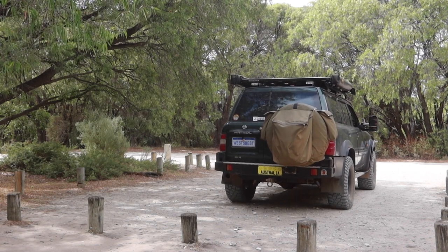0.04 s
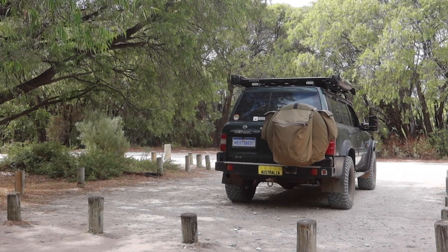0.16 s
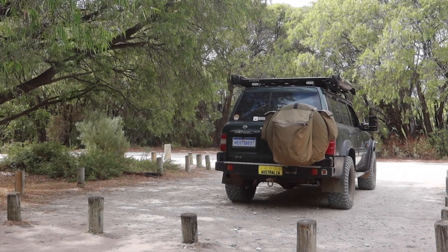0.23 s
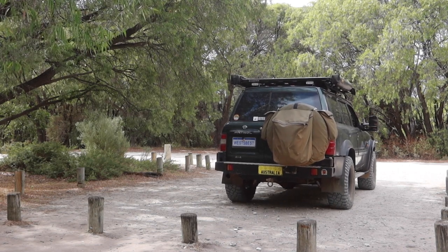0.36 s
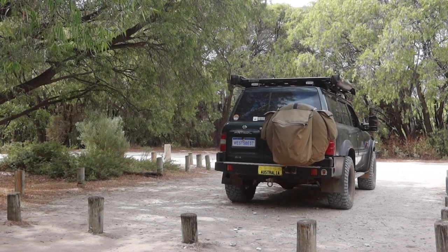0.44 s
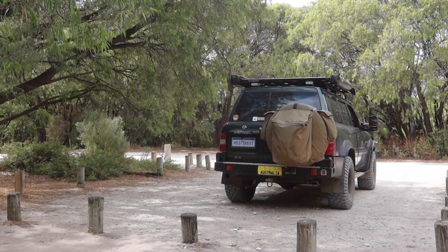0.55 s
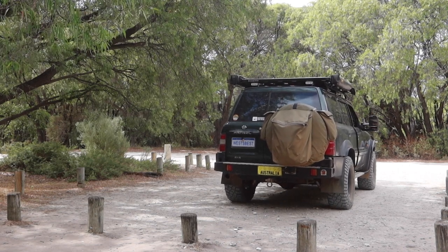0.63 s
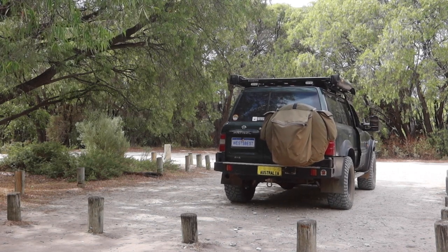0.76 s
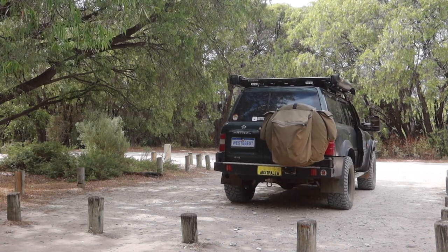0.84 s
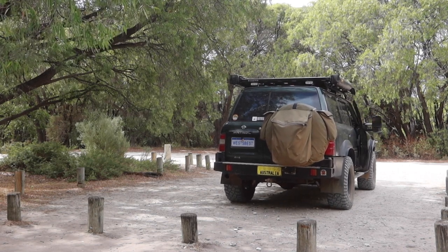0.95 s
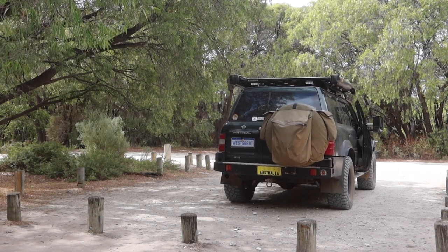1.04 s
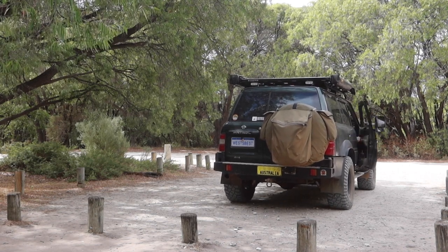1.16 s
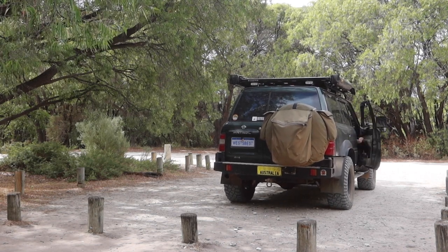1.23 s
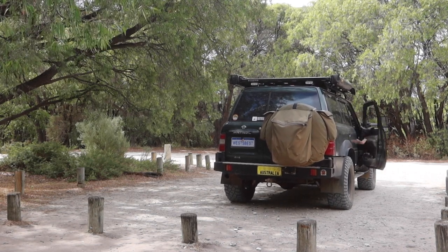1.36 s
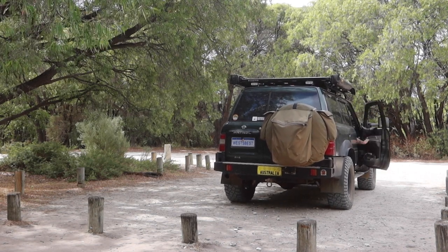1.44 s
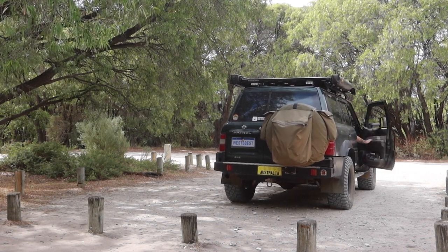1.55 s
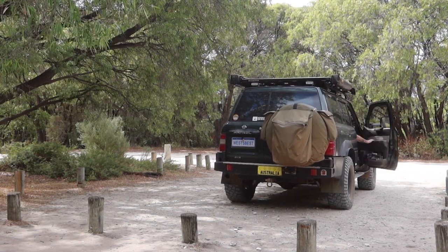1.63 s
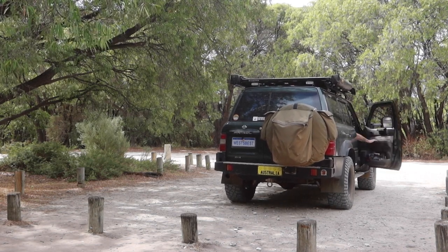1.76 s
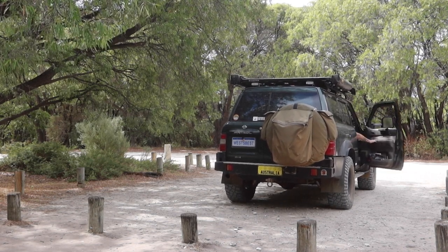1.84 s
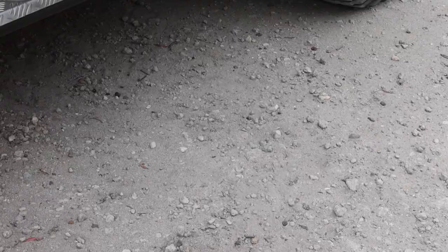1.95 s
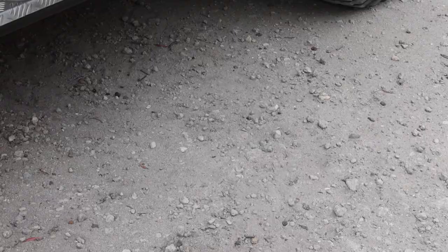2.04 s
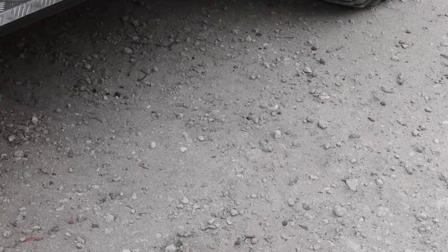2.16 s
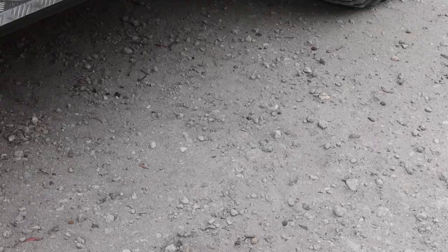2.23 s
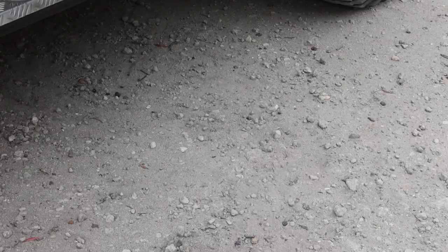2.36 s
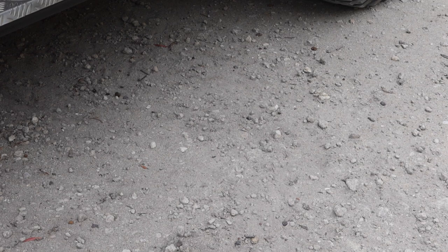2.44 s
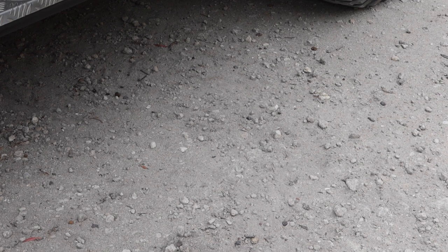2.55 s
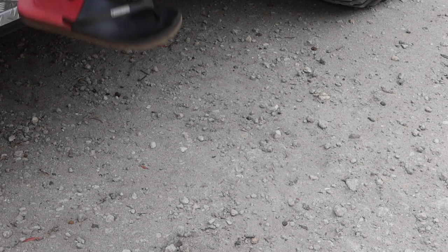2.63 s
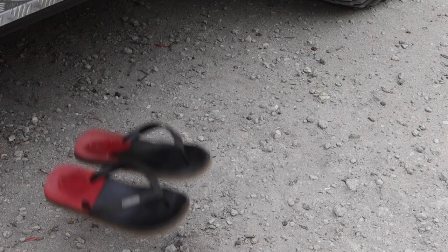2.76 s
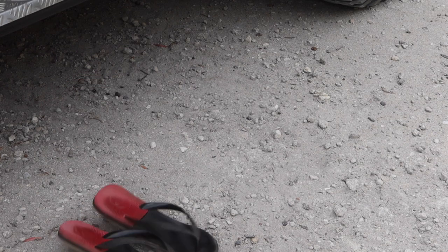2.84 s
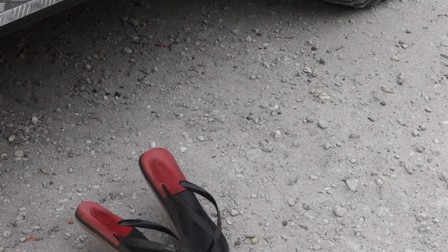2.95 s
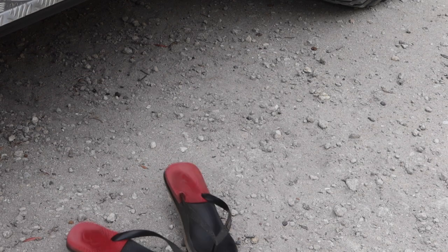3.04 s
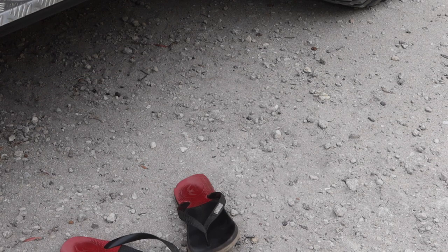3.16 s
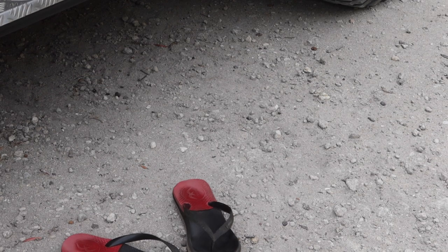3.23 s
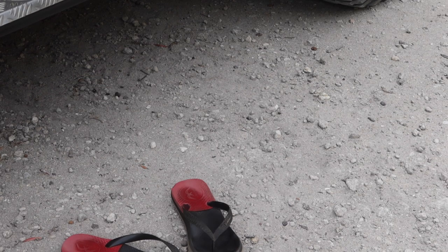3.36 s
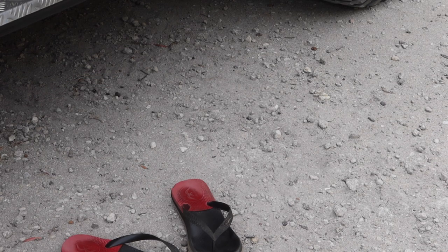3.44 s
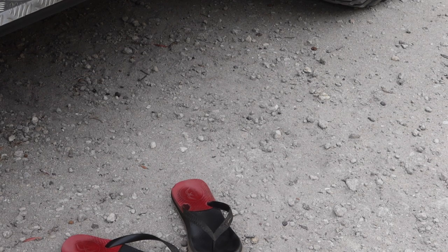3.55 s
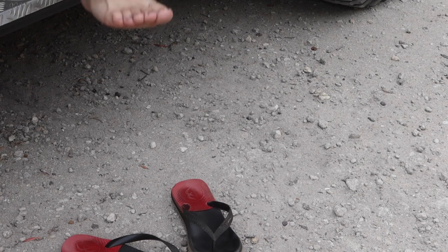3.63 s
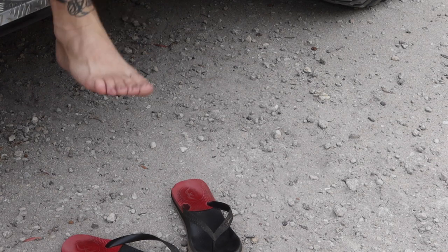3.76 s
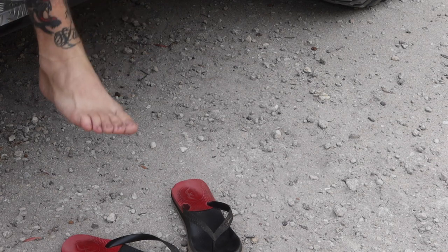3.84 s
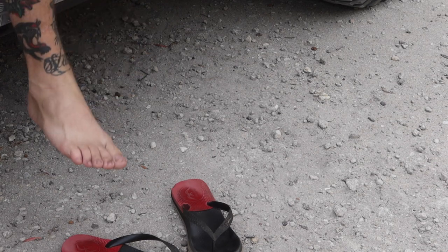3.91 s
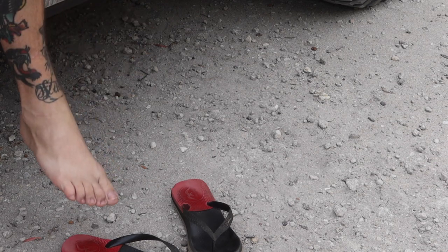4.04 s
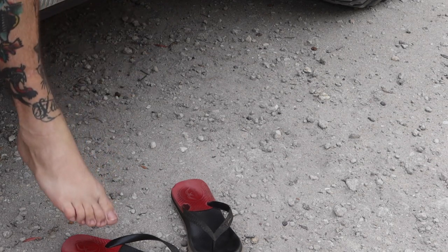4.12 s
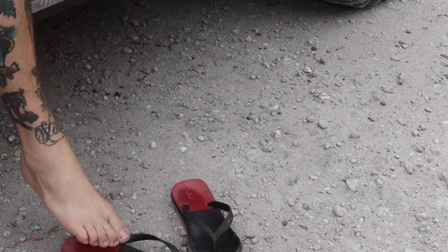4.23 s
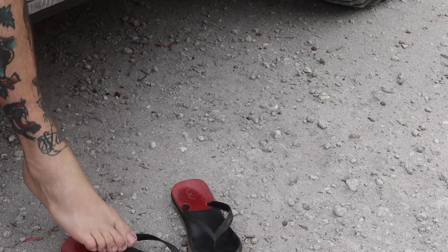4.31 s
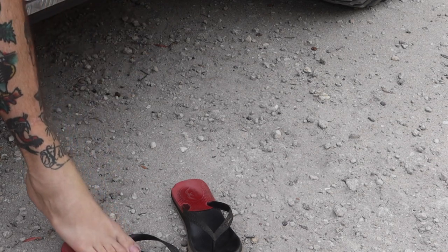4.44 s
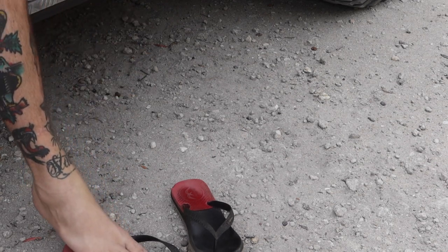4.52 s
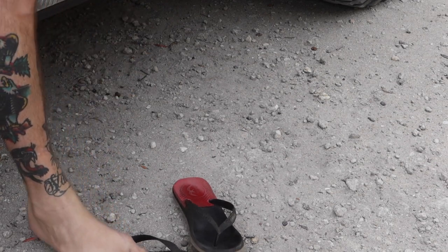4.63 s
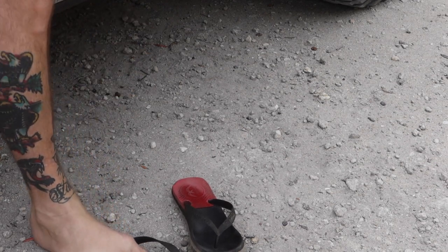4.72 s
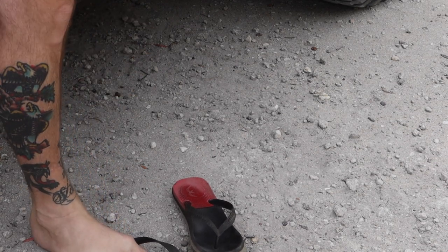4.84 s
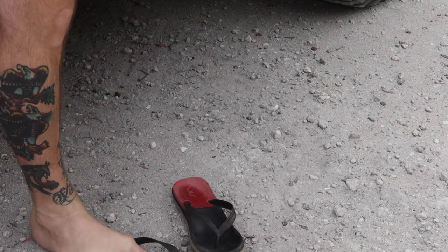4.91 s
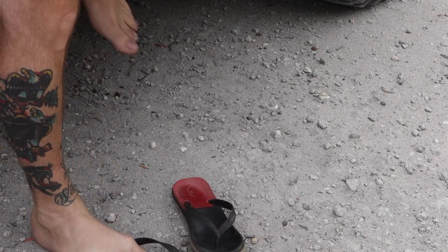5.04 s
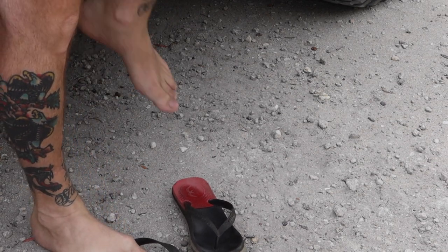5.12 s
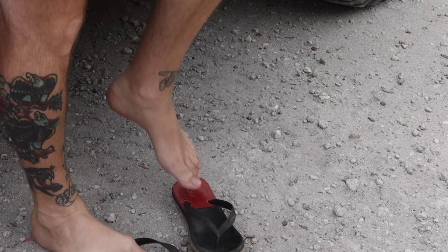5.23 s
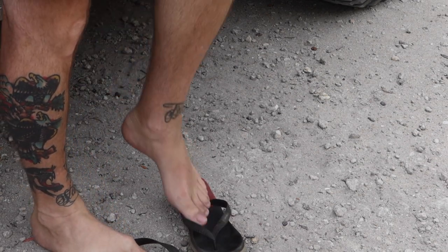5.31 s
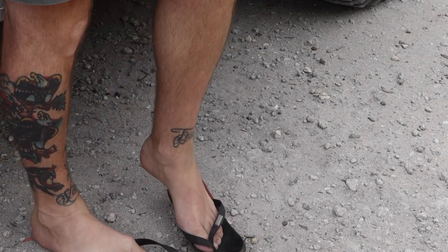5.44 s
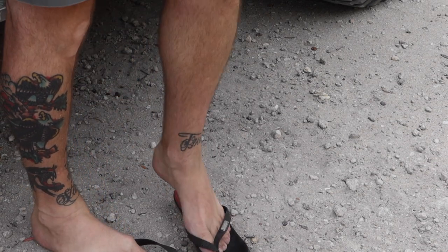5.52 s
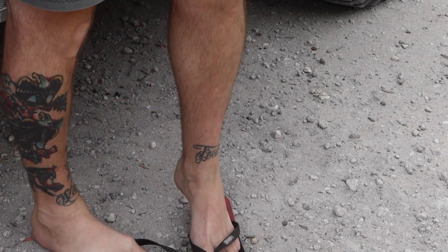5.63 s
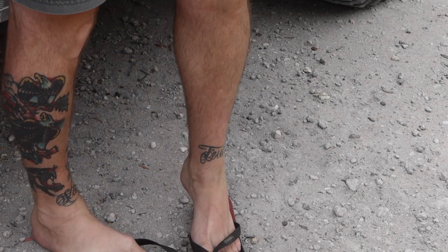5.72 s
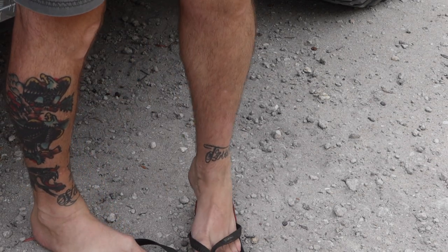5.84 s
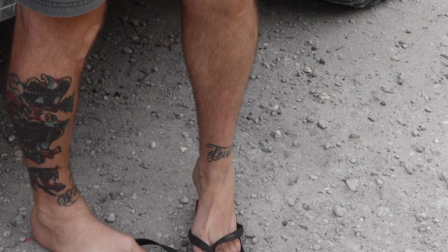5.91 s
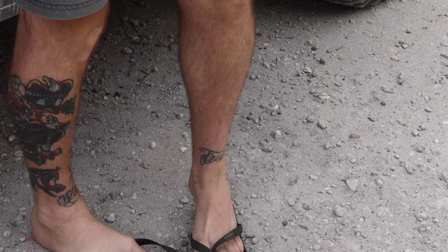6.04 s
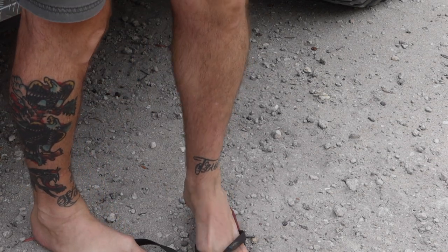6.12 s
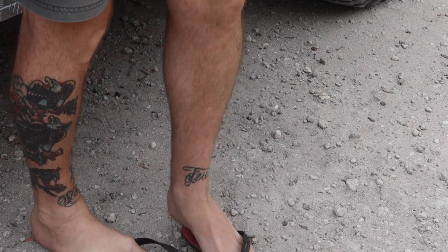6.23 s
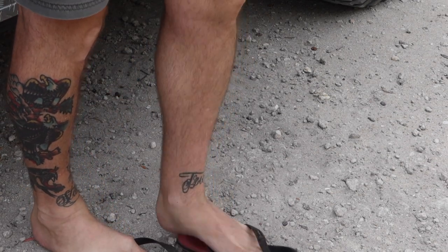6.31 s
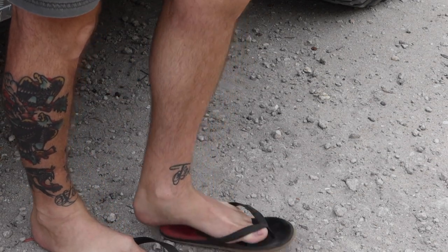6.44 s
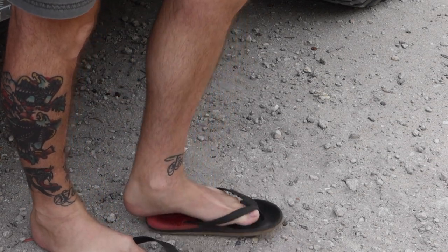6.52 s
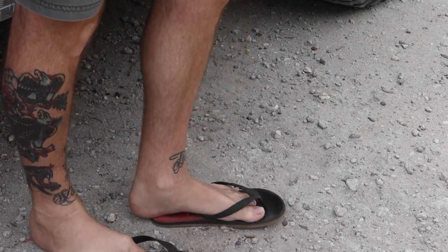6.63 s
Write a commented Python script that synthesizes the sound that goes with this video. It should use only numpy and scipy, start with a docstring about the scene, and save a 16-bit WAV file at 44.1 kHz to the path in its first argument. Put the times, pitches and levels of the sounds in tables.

```python
"""Rubber sandals slap onto gravel beside a parked four-wheel drive: air pulses, cracks, pitched resonances.
Clothes slide over the seat (hiss, scrape, hollow rub); feet step into the sandals (thuds, crunches, clicks)
and grind the grit (clumped snaps, ringing stones). Before that, a door is unlatched some way off (knocks,
rattles, steel clicks) in louder outdoor air (shaped, wandering noise). Dull bumps, a low wind rumble,
a brief hum and steady open air (shaped noise) lie behind."""
import sys
import numpy as np
from scipy import signal
from scipy.fft import rfft, irfft, next_fast_len
from scipy.io import wavfile
from scipy.ndimage import uniform_filter1d

SR = 44100
rng = np.random.default_rng(int(sys.argv[2]) if len(sys.argv) > 2 else 0)


def persist_wave(psi):
    """Save psi, clipped to +-1, as 16-bit WAV."""
    counts = np.round(np.clip(psi, -1, 1) * 32767).astype(np.int16)
    wavfile.write(sys.argv[1], SR, np.atleast_2d(counts).T)


N = 294323
TIME = np.arange(N) / SR   # s


def from_db(db):
    """Gain of a level in dB."""
    return 10 ** (np.asarray(db) / 20)


def rms_one(x):
    """The same signal at rms 1."""
    return x / np.sqrt(np.mean(x ** 2) + 1e-20)


def noise():
    """White noise."""
    return rng.standard_normal(N)


def coloured(x, spectrum):
    """Give a steady signal a spectrum, with 18 dB/octave skirts beyond its ends; rms 1."""
    hz, db = np.transpose(spectrum)
    size = next_fast_len(N, True)
    f = np.maximum(np.arange(size // 2 + 1) * SR / size, 1)
    skirts = np.minimum(f / hz[0], 1) ** 3 * np.minimum(hz[-1] / f, 1) ** 3
    gain = from_db(np.interp(np.log(f), np.log(hz), db)) * skirts
    return rms_one(irfft(rfft(x, size) * gain, size)[:N])


def band(x, low_hz, high_hz):
    """Gentle band-pass."""
    edges_hz = [low_hz, min(high_hz, .45 * SR)]
    return signal.sosfilt(signal.butter(2, edges_hz, "band", fs=SR, output="sos"), x + 1e-18)


def resonate(x, hz, width_hz):
    """A resonance with gain 1 on top."""
    r = np.exp(-np.pi * width_hz / SR)
    zeros = np.array([1, 0, -1]) * (1 - r * r) / 2
    poles = [1, -2 * r * np.cos(2 * np.pi * hz / SR), r * r]
    return signal.lfilter(zeros, poles, x + 1e-18)


def narrow_noise(hz, width_hz):
    """Noise in a resonance whose pitch may move; rms 1."""
    lowpass = signal.butter(2, width_hz / 2, fs=SR, output="sos")
    slow = signal.sosfilt(lowpass, noise() + 1j * noise())
    carrier = np.exp(2j * np.pi * np.cumsum(hz * np.ones(N)) / SR)
    return rms_one((slow * carrier).real)


def flutter(rate_hz, depth_db):
    """A gain gliding between random levels, rate_hz of them a second."""
    knots = rng.standard_normal(4096)
    return from_db(depth_db * np.interp(TIME * rate_hz, np.arange(len(knots)), knots))


def grains(per_s, spread_db):
    """Random clicks of either sign, their sizes spread exponentially in dB."""
    sizes = from_db(spread_db * np.minimum(rng.exponential(1, N), 4))
    return (rng.random(N) < per_s / SR) * sizes * rng.choice([-1, 1], N)


def evened(x):
    """Hold a noise at near-constant strength, so that its envelope decides how hard a blow is."""
    power = uniform_filter1d(x ** 2, size=SR // 80)   # over 12.5 ms
    return x / np.sqrt(power + .02 * np.mean(x ** 2))


def blows(times_s, levels_db, t60s, rise_s):
    """Envelope of blows that rise fast and die away; their powers add."""
    power = np.zeros(N)
    for at_s, db, t60_s in zip(times_s, levels_db, np.broadcast_to(t60s, len(times_s))):
        start = int(at_s * SR)
        age = TIME[:min(N - start, SR // 2)]
        envelope = from_db(db - 60 * age / t60_s) * (1 - np.exp(-age / rise_s))
        power[start:start + len(age)] += envelope ** 2
    return np.sqrt(power)


def stroke(start_s, length_s, rise_s, release_s):
    """Envelope of one movement: it swells, holds, and fades once its length is over."""
    swell = np.clip((TIME - start_s) / rise_s, 0, 1)
    return swell * np.clip(1 - (TIME - start_s - length_s) / release_s, 0, 1)


def strokes(rows, release_s):
    """Envelope of movements given as (start s, length s, rise s, dB); their powers add."""
    return np.sqrt(sum((from_db(db) * stroke(start_s, length_s, rise_s, release_s)) ** 2
                       for start_s, length_s, rise_s, db in rows))


def scattered(x, t60_s, delay_s):
    """Dense, short reflections from the car's side, its open door and the ground."""
    age = TIME[:SR // 4]
    build_up = 1 - np.exp(-(age / delay_s) ** 2)
    echo = rng.standard_normal(len(age)) * from_db(-60 * age / t60_s) * build_up
    return signal.fftconvolve(x, echo / np.linalg.norm(echo))[:N]


def sandals():
    """A sole moves a pulse of air and cracks on the grit; ground and car side colour the slap's pitch."""
    # rubber slaps and their echoes off the car's side:
    # t/s, pulse level/dB before band-pass, pulse f/Hz, crack re pulse/dB
    slaps = [(2.8628, 2, 660, -19.5), (2.8692, -4, 740, -20), (2.8707, -8.5, 1240, -19),
             (2.8754, -7.5, 1960, -7.5), (3.1241, -21, 1130, -11), (3.1312, -25.5, 2050, -8),
             (3.7161, -31, 1230, -28), (4.0964, -29, 3200, 0), (4.098, -19, 1390, -11),
             (6.0827, -33, 1000, -15)]
    # pitched colour of the slap between ground and car side: f/Hz, relative level/dB
    colour_modes = [(175, -28), (270, -26), (315, 1.5), (433, -32), (640, -5), (795, -1.5), (925, -15),
                    (1100, -19), (1288, 6.5), (1380, 3.5), (1615, -3), (2012, -0.5), (3336, 1), (3488, 0),
                    (3722, -10)]
    # crack on the grit: f/Hz, relative density/dB
    crack_spectrum = [(1060, -34), (1800, -4), (2020, -5), (2880, -9), (3600, -8), (4090, -10),
                      (4760, -13.5), (6410, -22), (8710, -15), (9790, -31.5), (15500, -38)]
    # scattered tail: f/Hz, relative density/dB
    tail_spectrum = [(71, -41), (120, -20), (264, 2), (667, -6), (1120, -13), (2080, -16), (2420, -28),
                     (2880, -21), (3430, -22), (12000, -39), (15600, -62), (22000, -120)]
    t_s, pulse_db, pulse_hz, crack_db = np.transpose(slaps)
    pulses = np.zeros(N)
    for at_s, db, hz in zip(t_s, pulse_db, pulse_hz):
        near = abs(TIME - at_s) < .01
        u = np.pi * hz * (TIME[near] - at_s)
        pulses[near] += from_db(db) * (2 * u * u + 0.75 * u - 1) * np.exp(-u * u)   # suction, rebound
    pulses = band(pulses, 117, 18000)   # a small sole radiates little bass
    colour = sum(from_db(db) * resonate(pulses, hz, width_hz=36) for hz, db in colour_modes)
    colour = np.roll(colour, SR // 500)   # this colour starts 2 ms later
    crack_gain = blows(t_s - .0006, pulse_db + crack_db, 0.019, rise_s=0.00031)
    crack = crack_gain * evened(coloured(noise(), crack_spectrum))
    sand_gain = blows(t_s - .0005, pulse_db + crack_db - 9, .007, rise_s=.0001)
    sand = sand_gain * rms_one(band(noise(), 7000, 16000))
    tail = blows(t_s, pulse_db - 24, .11, rise_s=.003) * evened(coloured(noise(), tail_spectrum))
    return pulses + from_db(-1.5) * colour + crack + sand + tail


def feet():
    """Weight comes onto rubber with a hollow thud; the grit beneath crunches and clicks at once."""
    # feet pressing on soles and ground: t/s, thud drive/dB, crunch/dB, click/dB, t60/s (click: 0.8 of it)
    steps = [(4.728, -31, -36, -47, 0.045), (4.765, -34.5, -46, -46, 0.17), (5.181, -34, -44, -52, 0.32),
             (5.202, -35.5, -42, -38, 0.037), (5.292, -40, -50, -58, 0.12),
             (5.331, -35.5, -47.5, -52, 0.35), (5.446, -30.5, -39, -47.5, .12),
             (5.465, -35.5, -43, -54, 0.2), (5.513, -32, -39, -47, 0.14), (5.557, -39.5, -42, -60, 0.14),
             (5.623, -42, -37.5, -48, 0.073), (5.795, -34, -43.5, -62, 0.046),
             (5.828, -42.5, -36, -52, .07), (6.078, -32.5, -38, -43.5, 0.072), (6.133, -36, -38, -62, .07),
             (6.213, -36.5, -43, -52, .12), (6.28, -41, -50, -62, .058), (6.318, -51, -41, -46.5, .12),
             (6.365, -34, -36.5, -44.5, .11), (6.389, -39, -39, -48, .04), (6.577, -38, -50, -66, 0.13),
             (6.656, -41.5, -36.5, -50, 0.2)]
    # thud: f/Hz, relative density/dB
    thud_spectrum = [(59, -33), (100, -3), (247, -2.5), (337, -3), (454, -0.5), (566, -2.5), (780, 1),
                     (1020, -8), (1140, -5.5), (1400, -24), (1820, -41), (3080, -120)]
    # resonances of a sole pressed on the ground: f/Hz, width/Hz, relative level/dB
    sole_modes = [(353, 39, 0.5), (553, 57, -0.5), (638, 37, -5.5), (790, 88, -11)]
    t_s, thud_db, crunch_db, click_db, t60_s = np.transpose(steps)
    push = blows(t_s, thud_db, t60_s, rise_s=0.0012) * evened(coloured(noise(), thud_spectrum))
    sole = sum(from_db(db - 3) * resonate(push, hz, width_hz) for hz, width_hz, db in sole_modes)
    thud = from_db(-4.) * push + sole
    crunch_grit = evened(band(grains(2000, spread_db=0.5), 900, 2980))
    crunch = blows(t_s, crunch_db, t60_s, rise_s=0.0011) * crunch_grit
    click_grit = evened(band(grains(2300, spread_db=-1.0), 3800, 9500))
    click = blows(t_s, click_db, t60_s * 0.8, rise_s=0.00028) * click_grit
    return thud + crunch + click


def gravel():
    """Grit gives way in clumps of tiny snaps, coloured by caught stones; larger stones ring briefly."""
    # a sole twists and grinds: start/s, length/s, relative level/dB, f of the stones caught under it/Hz
    twists = [(4.615, .075, -44, 2300), (4.695, 0.083, -41.5, 2700), (5.524, .075, -46.5, 2000),
              (5.62, .11, -45, 3200), (5.80, .075, -51, 2400), (6.058, 0.098, -48, 1700),
              (6.20, .04, -41.5, 2200), (6.263, 0.063, -44, 2100), (6.375, 0.14, -49.5, 1500),
              (6.594, 0.047, -45.5, 2000), (6.635, .04, -39, 2600)]
    # fine grit: f/Hz, relative density/dB
    grit_spectrum = [(350, -31), (600, -3.5), (775, -9), (852, -10), (1040, -2), (1670, -0.5), (2070, 0),
                     (3230, -4), (4460, -11.5), (7060, -20), (8750, -12.5), (10600, -32), (15000, -21)]
    # single stones snapping against each other: t/s, level/dB, f/Hz
    stones = [(2.9122, -28, 8500), (4.707, -25, 2796), (5.332, -25, 7540), (5.6257, -31, 2210),
              (5.678, -24, 5970), (5.6965, -34, 2200), (5.7173, -21, 2280), (5.761, -24.5, 2200),
              (5.869, -29, 2080), (5.909, -26, 2020), (5.927, -25.5, 2040), (6.0697, -26, 2010),
              (6.284, -25, 2120), (6.462, -28, 6000), (6.492, -29, 4200), (6.508, -20, 7000)]
    rise_s, release_s = 0.017, 0.028
    snaps = grains(1500, spread_db=4.5)
    grit = evened(coloured(snaps, grit_spectrum))
    grinding = np.zeros(N)
    for start_s, length_s, db, hz in twists:
        caught = from_db(-10) * evened(resonate(snaps, hz, width_hz=700))
        grinding += from_db(db) * stroke(start_s, length_s, rise_s, release_s) * (grit + caught)
    out = from_db(-5.0) * grinding * flutter(rate_hz=110, depth_db=3.5)
    for at_s, db, hz in stones:
        start = int(at_s * SR)
        age = TIME[:min(N - start, SR // 50)]
        snap = np.sin(2 * np.pi * hz * age) * np.exp(-age * hz / 0.79)
        chips = 0.079 * rng.standard_normal(len(age)) * np.exp(-age / 0.0011)
        out[start:start + len(age)] += from_db(db) * (snap + chips)
    return out + from_db(-3.0) * scattered(out, t60_s=0.1, delay_s=0.0018)


def clothes():
    """Threads catch and slip: a fine hiss, a scrape growing with effort, a rub of wandering pitch."""
    # cloth sliding over the seat: start/s, length/s, rise/s, relative hiss/dB, relative rub/dB
    slides = [(2.924, .17, 0.026, -57.5, -55), (3.088, .43, 0.051, -51, -46.5),
              (3.514, 0.11, 0.022, -56, -47.5), (3.631, .21, .08, -55, -54), (3.86, .24, .035, -53.5, -50),
              (4.109, 0.29, 0.034, -54.5, -48), (4.402, 0.17, 0.055, -46.5, -48.5),
              (4.567, .21, 0.025, -51, -49), (4.848, 0.089, 0.054, -48.5, -47),
              (4.925, .075, .025, -46.5, -40.7), (5.024, .1, 0.018, -82, -56.5)]
    # the sandals are picked up, then swung: start/s, length/s, rise/s, relative level/dB
    swings = [(2.36, 0.413, 0.19, -60.5), (2.72, 0.12, 0.094, -48.5)]
    # hollow rub: f/Hz, relative density/dB
    rub_spectrum = [(76, -44), (130, -9.5), (173, -6.5), (252, -8), (312, -1.5), (515, -3), (900, -3),
                    (1170, -39), (1980, -120)]
    # coarse scrape: f/Hz, relative density/dB
    scrape_spectrum = [(470, -7.5), (800, -3.5), (860, -14), (969, 3.5), (1050, -2), (1400, -3.5),
                       (1560, -4.5), (2000, -16), (2600, -38), (4400, -120)]
    # fine hiss: f/Hz, relative density/dB
    hiss_spectrum = [(1120, -11), (1900, 1.5), (2470, 1), (2680, 0.5), (2870, -0.5), (4190, -2), (4530, -3),
                     (5040, -1.5), (6910, -7.5), (8240, -3.5), (10800, -14), (13900, -11.5), (15500, -16)]
    release_s, door_echo_s = 0.046, 0.0017
    start_s, length_s, rise_s, hiss_db, rub_db = np.transpose(slides)
    hiss_gain = strokes(zip(start_s, length_s, rise_s, hiss_db), release_s)
    hiss_gain = hiss_gain * flutter(rate_hz=12, depth_db=0.5)
    rub_gain = strokes(zip(start_s, length_s, rise_s, rub_db), release_s)
    swing_gain = strokes(swings, release_s)
    effort = np.sqrt(hiss_gain * rub_gain) / from_db(-50)
    # 1.45 dB of scrape per dB of effort
    scrape_gain = from_db(-52.5) * effort ** 1.45 * flutter(rate_hz=35, depth_db=1.4)

    hollow = narrow_noise(480 * flutter(rate_hz=9, depth_db=1.08), width_hz=145)   # pitch ratio in dB
    rub = rub_gain * (from_db(-2.5) * hollow + from_db(-2.0) * coloured(noise(), rub_spectrum))
    scrape_gain = scrape_gain + from_db(-1.0) * swing_gain
    scrape = scrape_gain * coloured(grains(9000, spread_db=2.0), scrape_spectrum)
    hiss_gain = from_db(3.5) * hiss_gain + from_db(-2.0) * swing_gain
    hiss = hiss_gain * coloured(grains(14000, spread_db=1.5), hiss_spectrum)
    rustle = scrape + hiss
    door_echo = np.roll(rustle, int(door_echo_s * SR))   # off the open door
    return rub + 0.95 * rustle + 0.21 * door_echo


def door():
    """Each move of the latch knocks the panel, rattles the linkage and clicks steel on steel."""
    # moves of handle and latch: t/s, knock/dB, relative rattle/dB, rattle f/Hz, click/dB
    moves = [(.078, -40, -51.5, 3480, -53), (0.159, -49, -49, 3400, -60), (0.214, -39, -49.5, 3320, -46),
             (.574, -36.5, -47, 3400, -43), (0.581, -37, -47, 1890, -44), (0.637, -49, -47, 1980, -52),
             (.693, -42.5, -50, 3240, -50), (.761, -44, -37, 4000, -48), (.815, -37, -42, 2040, -60),
             (.980, -43, -72, 2000, -70)]
    # panel knock: f/Hz, relative density/dB
    knock_spectrum = [(41, -33), (70, -6), (303, -2.5), (683, -8.5), (899, -6.5), (1070, -10),
                      (1220, -16.5), (1350, -10), (1600, -22), (2080, -30), (3520, -120)]
    knock_t60_s, rattle_t60_s, click_t60_s = .15, 0.098, 0.044
    t_s, knock_db, rattle_db, rattle_hz, click_db = np.transpose(moves)
    knock = blows(t_s, knock_db, knock_t60_s, rise_s=0.0014) * evened(coloured(noise(), knock_spectrum))
    chatter = grains(5800, spread_db=4.5)
    linkage = band(chatter, 1180, 3800)
    rattle = np.zeros(N)
    for at_s, db, hz in zip(t_s, rattle_db, rattle_hz):
        ringing = evened(linkage + 1.5 * resonate(chatter, hz, width_hz=250))
        rattle += blows([at_s], [db], rattle_t60_s, rise_s=.001) * ringing
    steel = grains(5400, spread_db=4.0)
    steel = rms_one(band(steel, 5700, 9100) + resonate(steel, 8600, width_hz=1200))
    click = blows(t_s, click_db, click_t60_s, rise_s=0.0005) * steel
    return knock + rattle + click + from_db(-16) * scattered(knock + rattle, t60_s=0.42, delay_s=.025)


def bumps():
    """Soft, dull knocks, each a burst of noise in one broad band."""
    # door swinging against its stay, body shifting its weight: t/s, level/dB, f/Hz, t60/s
    knocks = [(.035, -44, 420, 0.17), (1.608, -43.5, 375, 0.18), (1.636, -42.5, 330, .19),
              (1.645, -43, 148, 0.15), (3.544, -37.5, 221, .086), (3.7116, -30, 1300, 0.022),
              (3.717, -35, 175, 0.095), (3.719, -37, 430, .092), (5.565, -41, 325, 0.13),
              (6.365, -34, 350, 0.073), (6.548, -36, 375, 0.029)]
    white = noise()
    return sum(blows([at_s], [db], t60_s, rise_s=0.0012) * evened(band(white, 0.76 * hz, 1.21 * hz))
               for at_s, db, hz, t60_s in knocks)


def low_sounds():
    """A lumpy low wind rumble, from 2.87 s on, and for a moment a wavering hum that sinks in pitch."""
    windy = np.clip((TIME - 2.87) / .25, 0, 1)   # rises over 0.25 s
    lumps = flutter(rate_hz=7.2, depth_db=4.0)
    rumble = from_db(-64) * windy * rms_one(band(noise(), 55, 150)) * lumps
    start_s, length_s, fade_s = 5.76, .49, .06
    from_hz, to_hz, settle_s = 102, 73, 0.215
    hum_hz = to_hz + (from_hz - to_hz) * np.exp(-np.maximum(TIME - start_s, 0) / settle_s)
    hum = stroke(start_s, length_s, fade_s, fade_s) * narrow_noise(hum_hz, width_hz=21)
    return rumble + from_db(-57.5) * hum


def outdoors():
    """Open air as steady shaped noise; louder air as wandering noise that ends abruptly at 1.915 s."""
    # steady open air: f/Hz, relative density/dB
    air_spectrum = [(15, -32), (25, -1), (64, -12.5), (96, -3.5), (119, -9), (198, -5), (227, -6.5),
                    (433, -8), (2700, -19.5), (6920, -22.5), (10900, -25.5), (15500, -22)]
    # louder outdoor air: f/Hz, relative density/dB
    loud_air_spectrum = [(15, -33), (25, -1), (55, -2.5), (159, -8), (235, -5.5), (446, -10), (530, -7),
                         (748, -8), (2270, -21), (3440, -29), (9000, -39), (11700, -55), (19800, -120)]
    air = from_db(-52.5) * coloured(noise(), air_spectrum)
    loud_gate = np.clip((1.915 - TIME) / 0.0064, 0, 1)
    wander = flutter(rate_hz=15.12, depth_db=2.35)
    return air + loud_gate * from_db(-52) * coloured(noise(), loud_air_spectrum) * wander


def scene():
    """All sources at one microphone."""
    near = sandals() + feet() + gravel() + clothes()
    return (near + door() + bumps() + low_sounds() + outdoors())[None]


def record(dry):
    """Overload clips at full scale; a steep low-pass cuts the top."""
    cutoff_hz = 15900
    lowpass = signal.ellip(10, .1, 70, cutoff_hz, fs=SR, output="sos")
    return signal.sosfilt(lowpass, np.clip(dry, -1, 1))


dry = scene()
out = record(dry)
persist_wave(out)
```